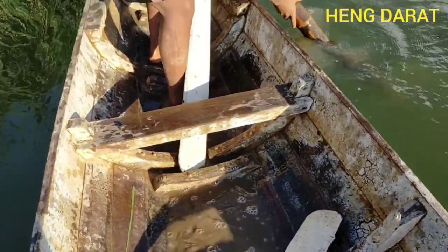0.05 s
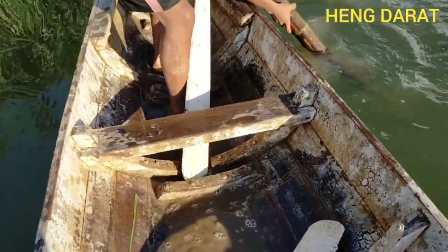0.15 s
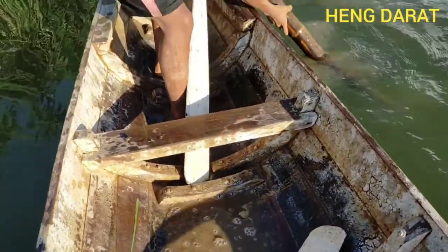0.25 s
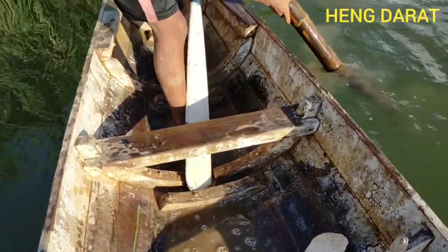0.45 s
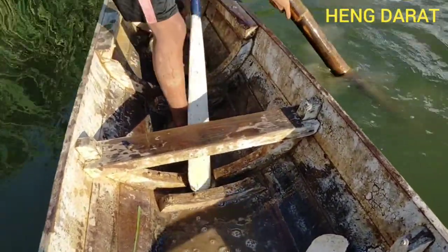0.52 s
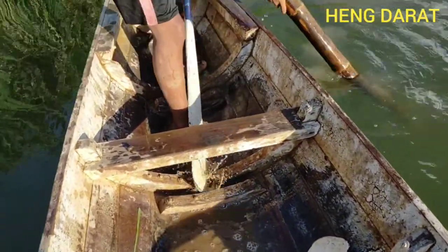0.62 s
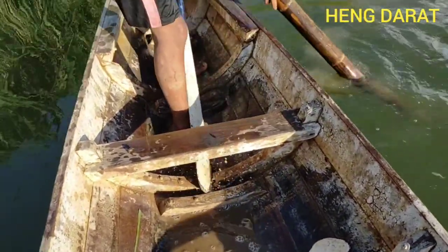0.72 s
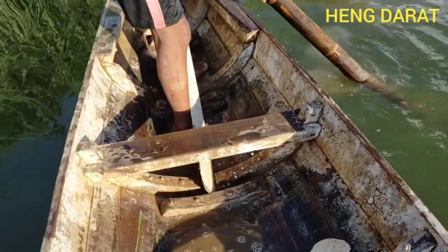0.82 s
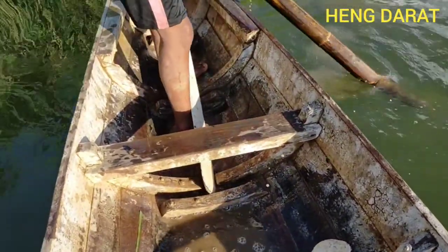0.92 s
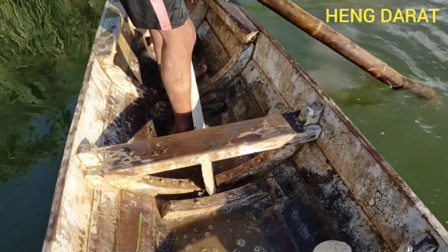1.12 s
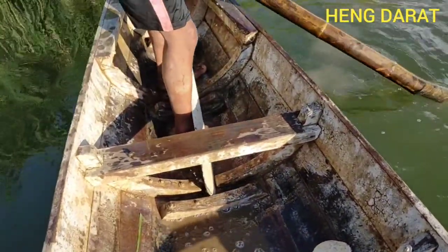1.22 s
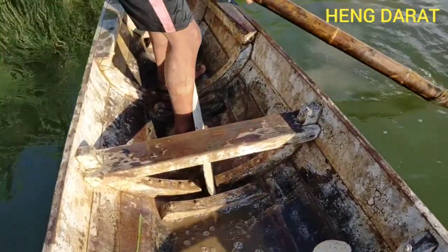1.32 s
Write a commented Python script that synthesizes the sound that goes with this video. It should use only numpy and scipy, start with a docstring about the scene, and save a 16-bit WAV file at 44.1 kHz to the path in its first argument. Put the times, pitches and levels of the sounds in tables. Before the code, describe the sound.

A loose paddle knocks on a wooden boat's planks, scrapes over wet boards and knocks again. Water then drips and splashes from a bamboo pole, while the calm river laps and light wind rumbles on the microphone.

```python
"""A loose paddle knocks on the planks of a wooden boat, scrapes over the wet boards, and knocks again.
Each knock is a short crack with the planks ringing on; under the scrape, soft heavy blows boom the hull.
The boat is poled along a calm river: the bamboo pole stirs the water and comes up dripping, in small
splashes and ringing bubbles. A thin squeak sounds early on. Behind it all, water laps and light wind
rumbles on the microphone."""
import sys
import numpy as np
from scipy import signal
from scipy.fft import rfft, irfft, next_fast_len
from scipy.io import wavfile
from scipy.ndimage import uniform_filter1d

SR = 44100
rng = np.random.default_rng(int(sys.argv[2]) if len(sys.argv) > 2 else 0)


def master_out(mix):
    """Clip the mix to full scale and print it as 16-bit PCM to the path in sys.argv[1]."""
    frames = np.transpose(np.atleast_2d(mix))
    ceiling = np.clip(frames, -1, 1)
    pcm = np.round(ceiling * 32767).astype(np.int16)
    wavfile.write(sys.argv[1], SR, pcm)


N = 59535
T = np.arange(N) / SR

# wood-on-wood hits: (time [s], crack [dB], ring [dB], contact [s], low cut [Hz], high cut [Hz],
# pitch [ratio])
KNOCKS = [(.4029, -14.5, -30.5, .0023, 560, 4540, 0.98), (.4096, -26, -31, 0.0027, 890, 3050, 0.87),
          (.4407, -36, -42.5, 0.0033, 380, 940, 0.69), (0.4623, -29.5, -38.5, .0018, 1960, 3150, 1.18),
          (.6731, -18, -36.5, 0.002, 1200, 1830, 0.878), (.67716, -22, -41.5, 0.00212, 844, 1600, 0.85),
          (.7175, -38, -40, 0.00299, 656, 1560, 0.85)]
# partials of the paddle's crack: (base pitch [Hz], relative level [dB])
PADDLE_PARTIALS = [(816, -8.5), (991, 2.5), (1286, 0), (1812, 3.5), (2429, -1), (2856, -10), (3689, -19)]
# ring of the planks, boom of the hull: (pitch [Hz], relative level [dB], t60 [s])
PLANK_MODES = [(240.5, 0, 0.21), (525.7, -.5, .15), (742, -2, 0.19), (794, 0, 0.11), (911, 2, 0.11),
               (1133, -0.5, 0.18), (1283, 4, 0.074), (1394, 3, 0.067), (1672, 2.5, 0.066), (1868, 3, 0.069),
               (2254, -7, 0.053), (2476, -2, 0.098)]
HULL_MODES = [(175.3, -15, 0.56), (235.2, -3.5, 0.19), (252, 2.5, 0.16), (283.5, -1, 0.147),
              (310, -16, 0.059), (407.7, -21.5, 0.46)]
# jerks of the sliding paddle: (time [s], wood [dB], wet hiss [dB], t60 [s], low cut [Hz])
JERKS = [(0.484, -34.5, -39.5, 0.079, 300), (0.5033, -27, -39.5, 0.17, 418),
         (0.5203, -23.5, -41, 0.058, 260), (0.532, -32.5, -40, 0.15, 505), (0.568, -34, -44, 0.059, 503),
         (.5930, -40.5, -42.5, 0.15, 1230), (.6220, -35.5, -50.5, 0.097, 1700)]
# soft low thumps (blows on the hull, then a plop of water and a bump of wind): (time [s], force [dB])
THUMPS = [(.362, -55), (0.402, -42), (.481, -37), (.507, -38), (.524, -29.5), (.549, -39), (.583, -35.5),
          (.72, -51), (.865, -44.5), (1.145, -52.5)]
# water falling from the pole: (time [s], slap [dB], spray [dB], t60 [s])
SPLASHES = [(0.8613, -54, -32, 0.016), (.908, -38, -73, 0.035), (0.937, -67, -36.5, 0.028),
            (0.951, -34, -57, 0.032), (0.975, -40, -48.5, 0.068), (0.982, -39.5, -54, 0.04),
            (1.008, -55, -37.5, 0.022), (1.026, -42.5, -43.5, 0.045), (1.0618, -44, -42.5, 0.078),
            (1.042, -67, -50, 0.17), (1.181, -37.5, -45.5, 0.026), (1.213, -48, -44.5, 0.099),
            (1.309, -36.5, -36, 0.026), (1.3266, -40, -29.5, 0.051)]
# bubbles, and a thin squeak near 0.2 s: (time [s], level [dB], starting pitch [Hz], t60 [s])
CHIRPS = [(.054, -39, 2526, 0.04), (0.08, -45, 1670, 0.041), (0.2, -41.5, 2437, 0.18),
          (0.213, -36.5, 2420, 0.078), (.219, -46.5, 2100, 0.16), (.979, -36, 1011, 0.051),
          (0.985, -31.5, 2660, 0.019), (0.992, -37.5, 1210, 0.094), (1.009, -20, 1628, 0.025),
          (1.0085, -35.5, 6710, 0.017), (1.0652, -15, 1660, 0.013), (1.065, -36, 3844, 0.029),
          (1.075, -34, 1307, 0.063), (1.1373, -29, 1660, 0.018), (1.17, -33.5, 2150, 0.019),
          (1.1826, -36, 1364, 0.026), (1.2563, -37, 1153, 0.034), (1.3103, -32.5, 1757, 0.017),
          (1.3264, -33.5, 6730, 0.031)]
# fader rides for lapping and wind: (time [s], relative level [dB])
LAP_LEVELS = [(0, -58.5), (.13, -60), (.22, -54.5), (.32, -57.5), (.6, -64.5), (.82, -60), (.9, -56.5),
              (1.1, -62), (1.22, -56.5), (1.35, -55)]
GUST_LEVELS = [(0, -35), (0.044, -37), (0.077, -49), (.12, -39), (.21, -32.5), (.285, -36), (.34, -43.5),
               (.44, -54), (.51, -53.5), (.6, -46.5), (.72, -38.5), (0.801, -38.5), (.87, -48),
               (0.918, -42.5), (1.0, -55), (1.088, -38.5), (1.23, -47.5), (1.31, -43)]

# tone colours: (frequency [Hz], relative density [dB])
WASH_COLOUR = [(100, -1), (250, -1), (370, -2), (550, 1.5), (1300, -8), (2400, -6), (3200, -21),
               (4500, -30), (7500, -20), (15500, -15.5)]  # the boat's dense, weaker modes
SCRAPE_COLOUR = [(200, -30), (380, -2), (550, 5), (1050, 1.5), (1700, 3.5), (2300, 1), (2900, -3.5),
                 (3600, -20), (5000, -32.5), (16000, -67)]  # wood rasping on wood
SLAP_COLOUR = [(200, -14), (700, -23), (1100, 5.5), (1650, 10), (2100, 1.5), (2650, 4), (3500, -14.5),
               (5000, -36), (16000, -41)]  # body of a splash
SPRAY_COLOUR = [(1000, -20), (3000, 5), (4800, -7), (6500, 1.5), (7800, 5), (8700, -6), (9900, 2.5),
                (11500, -6.5), (13500, 1), (15300, 7.5)]  # spray and wet grit
LAP_COLOUR = [(200, 0.5), (500, -2), (1000, 0), (1650, 3), (1950, 2.5), (2350, 5.5), (2900, -5),
              (4300, -16), (7500, -11.5), (16000, -23)]  # water round the pole
WIND_COLOUR = [(15, -5.5), (44, -6), (59, 3.5), (78, -8), (120, -14.5), (180, -23), (300, -45.5),
               (700, -47), (3000, -84)]  # low rumble
AIR_COLOUR = [(100, 1), (300, 10.5), (500, -8), (1500, 3.5), (2500, -4), (3500, -3.5), (5000, -32),
              (7600, 1), (9000, -14.5), (10200, -9.5), (12000, -8.5), (15400, 3)]  # open air


def knocks():
    """Each hit cracks the paddle, pitched by where it lands; the boat rings on. Bright hits tick more."""
    wash_db, wash_t60, tick_db, tick_t60, tick_top_hz = 3.5, 0.12, -9, 0.013, 14000
    wash = noise(WASH_COLOUR)
    grit = rms_one(butter(rng.standard_normal(N), [3600, tick_top_hz], "band", order=1))
    out = 0
    for s, crack_db, ring_db, contact_s, low_hz, high_hz, pitch in KNOCKS:
        t = since(s)
        contact = (t / contact_s) ** 2
        partials = sum(from_db(db) * np.sin(2 * np.pi * pitch * hz * t) for hz, db in PADDLE_PARTIALS)
        crack = contact * np.exp(1 - contact) * partials
        tail = ring(click(s + contact_s), PLANK_MODES)
        tail += from_db(wash_db) * wash * fade(t, contact_s, wash_t60)
        wood = from_db(crack_db) * crack + from_db(ring_db) * tail
        out += butter(butter(wood, low_hz, "high", order=1), high_hz, "low")
        tick = grit * fade(t, contact_s / 2, tick_t60)
        out += from_db(crack_db + tick_db) * high_hz / tick_top_hz * tick
    return out


def scrape():
    """Each jerk is a burst of slips over wet boards that drives the planks and squeezes out a fizz."""
    ring_db = -15.5
    rasp = coloured(grains(per_s=2700, spread_db=3), SCRAPE_COLOUR)
    fizz = rms_one(noise(SPRAY_COLOUR) + droplets(SPRAY_COLOUR, low_hz=2498, high_hz=16180))
    wood = wet = 0
    for s, wood_db, hiss_db, t60, low_hz in JERKS:
        stroke = fade(since(s), attack_s=0.0011, t60=t60)
        wood += from_db(wood_db) * butter(stroke * rasp, low_hz, "high")
        wet += from_db(hiss_db) * stroke * fizz
    planks = ring(wood, PLANK_MODES) / np.std(ring(rasp, PLANK_MODES))
    return wood + from_db(ring_db) * planks + wet


def low_thumps():
    """Blows, a plop and a wind bump, all voiced by the hull's low modes, which water keeps murmuring."""
    force = sum(from_db(db) * click(s) for s, db in THUMPS)
    booms = sum(ring(force, [mode]) for mode in HULL_MODES)  # one by one, so all start in phase
    murmur = rms_one(ring(rng.standard_normal(N), HULL_MODES))
    return butter(booms, [130, 480], "band") + from_db(-67) * murmur


def splashes():
    """Water falls from the pole: a slap and a burst of fine droplets."""
    slap = droplets(SLAP_COLOUR, low_hz=569.3, high_hz=4763)
    spray = droplets(SPRAY_COLOUR, low_hz=2554, high_hz=19230)
    out = 0
    for s, slap_db, spray_db, t60 in SPLASHES:
        water = from_db(slap_db) * slap + from_db(spray_db) * spray
        out += fade(since(s), attack_s=0.0023, t60=t60) * water
    return out


def droplets(colour, low_hz, high_hz, pitches=44, per_s=5300, t60_cycles=95):
    """A fizz of tiny bubbles, each pinging at its own pitch; rms 1."""
    pings = 0
    for hz in np.geomspace(low_hz, high_hz, pitches):
        drops = grains(per_s / pitches, spread_db=4.5)
        pings += hz * ring(drops, [(hz, 0, t60_cycles / hz)])
    return coloured(pings, colour)


def bubbles_and_squeak():
    """Short ringing chirps, rising in pitch and wobbling in level: bubbles, and a thin squeak."""
    rise_per_s, wobble_hz, wobble_depth = 1.0, 300, 0.4
    out = 0
    for s, db, hz, t60 in CHIRPS:
        t = since(s)
        chirp = np.sin(2 * np.pi * hz * t * (1 + rise_per_s * t / 2))
        out += from_db(db) * fade(t, attack_s=0.0016, t60=t60) * chirp
    wobble = rms_one(butter(rng.standard_normal(N), wobble_hz, "low"))
    return out * (1 + wobble_depth * wobble)


def lapping():
    """Water laps round the pole: a fine patter that swells and sinks."""
    return ride(LAP_LEVELS) * coloured(grains(per_s=3900, spread_db=3), LAP_COLOUR)


def wind():
    """Wind rumbles on the microphone; the rumble is evened out so the gusts set its strength."""
    rumble = noise(WIND_COLOUR)
    return from_db(-1.5) * ride(GUST_LEVELS) * rumble / envelope(rumble, samples=2200)


def open_air():
    """A faint, steady bed of outdoor hiss."""
    return from_db(-57.5) * noise(AIR_COLOUR)


def from_db(db):
    """Decibels to gain."""
    return 10 ** (np.asarray(db) / 20)


def rms_one(x):
    """Scale to rms 1."""
    return x / np.sqrt(np.mean(x ** 2) + 1e-20)


def since(s):
    """Seconds since an event, zero before it."""
    return np.maximum(T - s, 0)


def fade(t, attack_s, t60):
    """Quick attack, exponential decay."""
    return (1 - np.exp(-t / attack_s)) * from_db(-60 * t / t60)


def ride(levels):
    """Gain gliding through fader points."""
    return from_db(np.interp(T, *np.transpose(levels)))


def envelope(x, samples):
    """Running rms level."""
    return np.sqrt(np.abs(uniform_filter1d(x ** 2, size=samples)) + 1e-20)


def butter(x, hz, kind, order=2):
    """Causal Butterworth filter."""
    sections = signal.butter(order, np.clip(hz, 10, .45 * SR), kind, fs=SR, output="sos")
    return signal.sosfilt(sections, x + 1e-18)


def coloured(x, colour):
    """Minimum-phase EQ, so that nothing sounds early; rms 1."""
    hz, db = np.transpose(colour)
    size = 2 * next_fast_len(N)
    bin_hz = np.maximum(np.arange(size // 2 + 1) * SR / size, 1)
    gain = from_db(np.interp(np.log(bin_hz), np.log(hz), db))
    cepstrum = irfft(np.log(gain))
    cepstrum[size // 2:] = 0
    response = np.exp(2 * rfft(cepstrum))
    return rms_one(irfft(rfft(x, size) * response)[:N])


def noise(colour):
    """Smooth coloured noise."""
    return coloured(rng.standard_normal(N), colour)


def grains(per_s, spread_db):
    """Random clicks of uneven size."""
    sizes = from_db(spread_db * np.minimum(rng.exponential(1, N), 4)) * rng.choice([-1, 1], N)
    return sizes * (rng.random(N) < per_s / SR)


def click(s):
    """A unit blow."""
    return 1. * (np.arange(N) == int(s * SR))


def ring(force, modes):
    """A force sets a body's modes ringing, in alternating polarity."""
    out = 0
    for k, (hz, db, t60) in enumerate(modes):
        decay, angle = from_db(-60 / (t60 * SR)), 2 * np.pi * hz / SR
        feedback = [1, -2 * decay * np.cos(angle), decay * decay]
        out += (-1) ** k * from_db(db) * signal.lfilter([0, np.sin(angle)], feedback, force + 1e-18)
    return out


def scene():
    """Everything sits in the centre; the treble widens a little, most during the splashes."""
    width_from_hz, treble_width_db, splash_treble_width_db = 5000, -17.5, -14
    mid = knocks() + low_thumps() + scrape() + bubbles_and_squeak() + splashes()
    mid += wind() + lapping() + open_air()
    treble_level = envelope(butter(mid, width_from_hz, "high", order=6), samples=200)
    side = from_db(treble_width_db) * treble_level * noise(SPRAY_COLOUR)
    side += from_db(splash_treble_width_db) * splashes()
    side = butter(side, width_from_hz, "high", order=6)
    return np.array([mid + side, mid - side])


def record(dry, cutoff_hz=15900):
    """A steep high cut takes off the very top."""
    return signal.sosfilt(signal.ellip(12, .2, 80, cutoff_hz, fs=SR, output="sos"), dry)


dry = scene()
out = record(dry)
master_out(out)
```